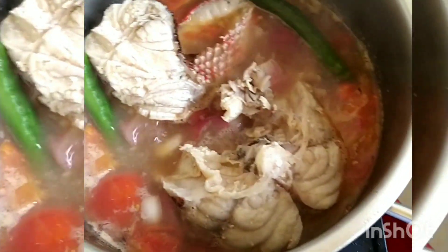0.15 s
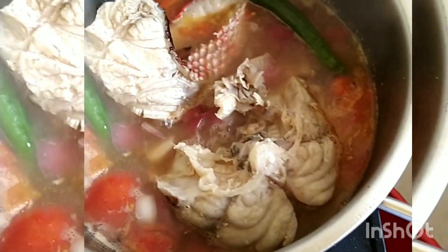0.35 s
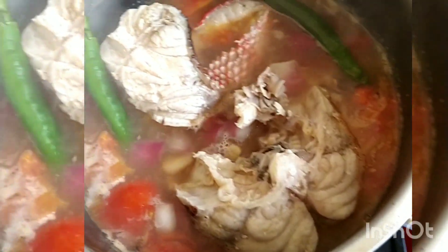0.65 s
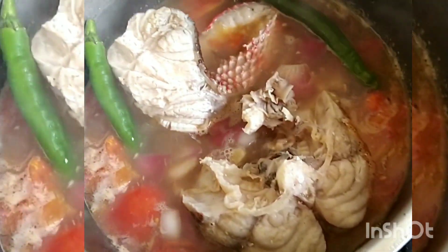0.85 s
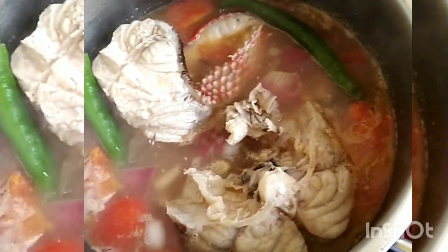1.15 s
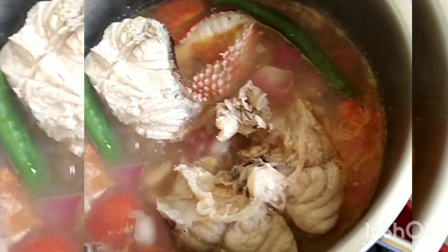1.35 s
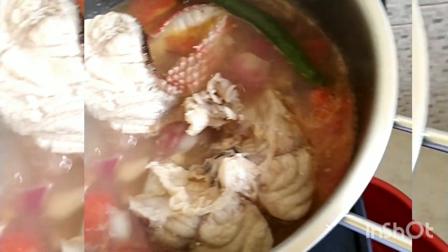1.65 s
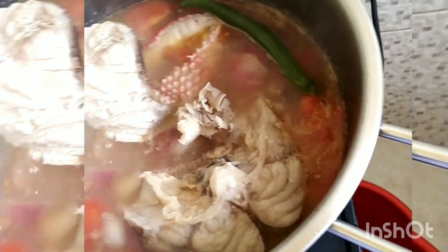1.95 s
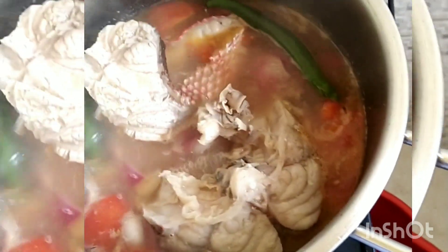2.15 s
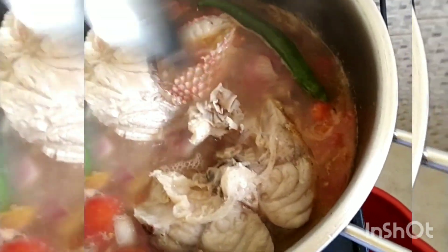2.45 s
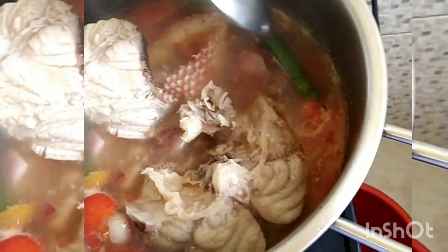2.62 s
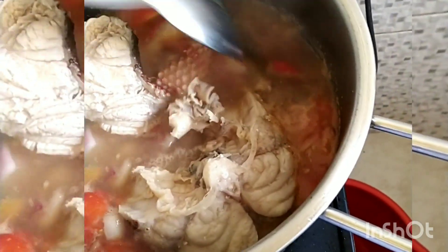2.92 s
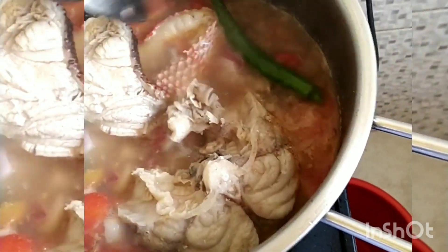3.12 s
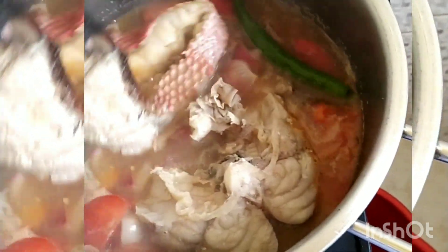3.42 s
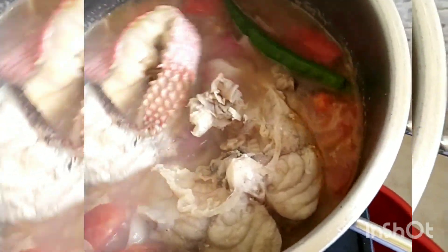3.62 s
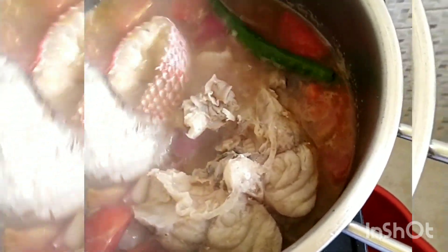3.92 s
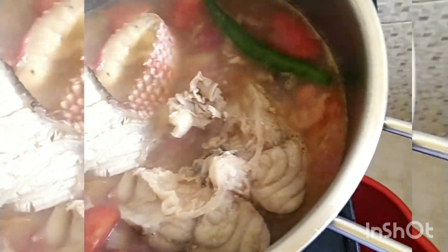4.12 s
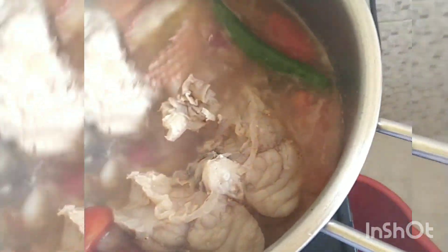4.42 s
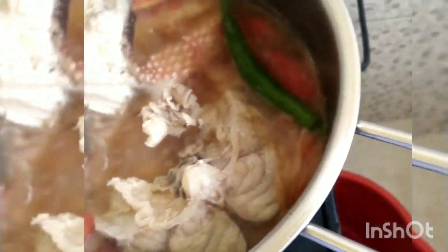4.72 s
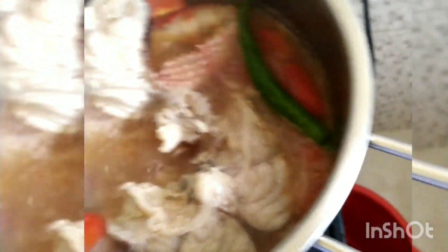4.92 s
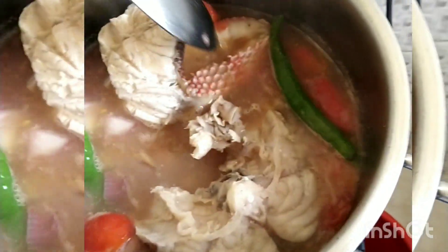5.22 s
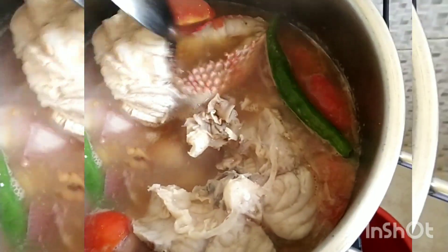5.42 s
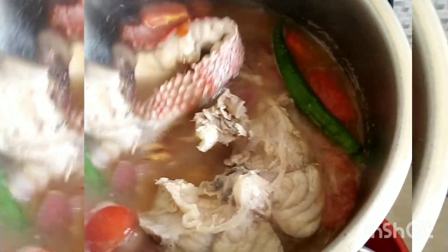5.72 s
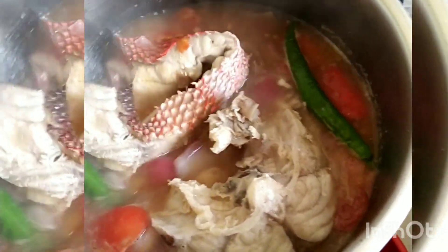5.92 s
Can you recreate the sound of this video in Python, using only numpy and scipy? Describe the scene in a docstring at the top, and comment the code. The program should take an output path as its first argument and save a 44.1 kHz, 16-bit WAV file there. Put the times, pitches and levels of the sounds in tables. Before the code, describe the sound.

Stew simmers softly in a steel pot close to the microphone, fizzing, spitting and plopping over a low burner rush and faint hum. Dull knocks come first, then a spoon clanks, a fork clinks and a quick rattle rings the pot with a low thump. After a stretch of quiet bubbling, a utensil is knocked down with one sharp crack in the hard-walled kitchen.

```python
"""Stew simmering in a kitchen

A steel pot of stew starts to simmer close by, over the rush of the stove and a faint hum.
Metal utensils clatter, clink on the pot and are knocked down: each blow cracks, rings briefly
and hangs between the hard walls. In between, the broth fizzes, spits and plops as bubbles break."""
import sys
import numpy as np
from scipy import signal
from scipy.fft import rfft, irfft, next_fast_len
from scipy.io import wavfile
from scipy.ndimage import map_coordinates

SR = 44100
rng = np.random.default_rng(int(sys.argv[2]) if len(sys.argv) > 2 else 0)


def pcm_store(signal):
    """Save signal as 16-bit PCM."""
    levels = np.round(np.clip(np.atleast_2d(signal), -1, 1) * 32767)
    wavfile.write(sys.argv[1], SR, levels.astype(np.int16).T)


N = 267687
GRID_HZ = np.fft.rfftfreq(16384, 1 / SR)
# bright colour of a tiny tick: f/Hz, level/dB
TICK_COLOUR = [(1200, -21.5), (2100, -3), (3000, -5.5), (4300, -10.5), (6000, -9.5), (8000, -2),
               (10000, 5.5), (11500, -5), (14000, -10.5), (15500, -33.5)]


def amp(db):
    return 10 ** (np.asarray(db) / 20)


def unit(x):
    return x / np.sqrt(np.mean(x ** 2) + 1e-20)


def blow(x):
    """Give x the energy of 5 ms at rms 1."""
    return unit(x) * np.sqrt(SR / 200 / x.shape[-1])


def along(points, hz):
    """Read (f/Hz, value) points on a log axis."""
    f, v = np.transpose(points)
    return np.interp(np.log(hz + 1), np.log(f + 1), v)


def add(track, s, x):
    """Mix x into the track from time s on."""
    part = track[:, round(s * SR):][:, :x.shape[-1]]
    part += x[..., :part.shape[-1]]


def wobble(rate):
    """A smooth random curve, rate knots a second."""
    knots = rng.standard_normal(int(N * rate / SR) + 4)
    return map_coordinates(knots, [np.arange(N) * rate / SR])


def colour(points):
    """An EQ curve of rms 1 from (f/Hz, level/dB) points."""
    return unit(amp(along(points, GRID_HZ)))


def resonances(modes, spread):
    """An EQ curve of steep peaks, their widths scaled by spread."""
    hz, width, db = np.transpose(modes)[:, :, None]
    peaks = amp(db) / (1 + (2 * (GRID_HZ - hz) / (spread * width)) ** 2)
    return unit(np.linalg.norm(peaks, axis=0))


def response(gain):
    """The minimum-phase impulse response of an EQ curve."""
    cepstrum = irfft(np.log(gain + 1e-6))
    half = len(cepstrum) // 2
    cepstrum[1:half] *= 2
    cepstrum[half + 1:] = 0
    return irfft(np.exp(rfft(cepstrum)))[None, :half]


def coloured(x, gain):
    """Play x through an EQ curve, letting its peaks ring."""
    return signal.fftconvolve(x, response(gain), axes=1)[:, :x.shape[-1]]


def filtered(x, gain_at):
    """Zero-phase EQ by a function of frequency."""
    n = x.shape[-1]
    m = next_fast_len(n + 8192)
    return irfft(rfft(x, m) * gain_at(np.fft.rfftfreq(m, 1 / SR)), m)[..., :n]


def diffuse(n, apart_hz=880, alike=0.97):
    """Stereo room noise: alike in the bass, unrelated in the treble."""
    mid, side = rng.standard_normal((2, n))
    turn = lambda hz: np.arccos(np.clip(alike * np.sinc(hz / apart_hz), -1, 1)) / 2
    mid = filtered(mid, lambda hz: np.cos(turn(hz)))
    side = filtered(side, lambda hz: np.sin(turn(hz)))
    return np.array([mid + side, mid - side])


def crack(gain, t60):
    """A contact's transient: a short burst of coloured noise."""
    t = np.arange(SR // 5) / SR
    return blow(coloured(diffuse(len(t)) * amp(-60 * t / t60), gain))


def kitchen(direct, radiated, room_db, build_s=0.0024):
    """Direct sound plus a diffuse tail in which each frequency dies at its own speed."""
    # reverb time: f/Hz, t60/s
    decay = [(100, 0.49), (260, 0.54), (700, 0.54), (1840, 0.52), (4850, 0.56), (9000, 0.43), (13000, 0.36)]
    hz, t, bands = signal.stft(diffuse(SR * 2 // 3), SR, nperseg=256)
    tail = signal.istft(bands * amp(-60 * t / along(decay, hz)[:, None]), SR, nperseg=256)[1]
    tail *= 1 - np.exp(-np.arange(tail.shape[1]) / SR / build_s)
    wet = signal.fftconvolve(radiated[:1], tail, axes=1)
    wet *= amp(room_db) * np.linalg.norm(direct) / np.linalg.norm(wet)
    add(wet, 0, direct)
    return wet


def background(rush_db=-51, hiss_db=-63, hum_trim_db=-2, waver_rad=0.8):
    """The burner's rush, a thin high hiss of distant simmering and a slightly unsteady hum."""
    # two noise colours and the hum's partials: f/Hz, relative level/dB
    rush_colour = [(20, -43.5), (38, -33.5), (50, -23.5), (66, -0.5), (95, -7.5), (130, -4), (235, -7),
                   (320, -4.5), (500, -8), (890, -12), (1500, -19), (2100, -35), (2700, -72), (6000, -54),
                   (9000, -65)]
    hiss_colour = [(6000, -37.5), (8300, -21), (9300, 4.5), (10200, 0.5), (11200, -33.5), (14000, -24.5),
                   (15500, -32.5)]
    partials = [(123.8, -61), (172.3, -59.5), (344.5, -61.5), (403.7, -67.5)]
    t = np.arange(N) / SR
    rush = amp(rush_db) * unit(coloured(diffuse(N), colour(rush_colour)))
    hiss = amp(hiss_db + 1.1 * wobble(32)) * unit(coloured(diffuse(N), colour(hiss_colour)))
    hum = np.zeros(N)
    for hz, db in partials:
        level = amp(db + hum_trim_db + 2.2 * wobble(7))
        hum += level * np.sqrt(2) * np.sin(2 * np.pi * hz * t + waver_rad * wobble(11))
    return rush + hiss + hum


def bubble(hz, t60, rise=3):
    """A bursting bubble rings briefly while its pitch climbs."""
    t = np.arange(SR // 10) / SR
    chirp = np.sin(2 * np.pi * hz * (t + rise * t * t)) * amp(-60 * t / t60)
    return blow(np.tile(chirp, (2, 1)))


def bubbling(count=130, pitch_hz=620, level_db=-58):
    """Small bubbles of scattered size break all over the broth."""
    out = np.zeros((2, N))
    times = rng.uniform(0, N / SR, count)
    for s, (detune, strength) in zip(times, rng.standard_normal((count, 2))):
        hz = pitch_hz * np.exp(0.32 * detune)
        add(out, s, amp(level_db + 2 * strength) * bubble(hz, t60=10 / hz))
    return kitchen(out, out, room_db=8)[:, :N]


def in_pot(ring_db):
    """The colour of a tick with the pot's ring added."""
    # the open pot above the broth: f/Hz, width/Hz, level/dB
    modes = [(2052, 100, 2.5), (2528, 42, 1.5), (2920, 19, 3), (3450, 99, -8.5), (4080, 75, -16),
             (4620, 100, -8), (5140, 38, -5.5), (7170, 40, 0), (7670, 54, -8), (8220, 230, -5.5),
             (9100, 340, -0.5), (10440, 110, -1.5), (11280, 61, -8), (12320, 43, -12), (12400, 130, -13.5),
             (12980, 49, -14), (13400, 84, -9.5)]
    return np.hypot(colour(TICK_COLOUR), amp(ring_db) * resonances(modes, spread=3.2))


def droplet(mid_db, ring_db, body_db=8, body_hz=4800):
    """The colour of a tick in the pot; wetter ones have more body."""
    return in_pot(ring_db) * amp((mid_db + body_db) / (1 + (GRID_HZ / body_hz) ** 2))


def ticks(gain, per_second=260, scatter_db=5, t60=0.012):
    """Countless spurts of very uneven size, at rms 1."""
    onsets = rng.random(N) < per_second / SR
    sizes = onsets * amp(scatter_db * np.clip(rng.standard_normal(N), -2, 2))
    power = signal.lfilter([1], [1, -amp(-60 / (t60 * SR)) ** 2], sizes ** 2)
    return unit(coloured(np.sqrt(power) * rng.standard_normal((2, N)), gain))


def sizzle(rise_s=0.03, fall_s=0.064, rest_db=-75, pan_db=1.8):
    """The broth fizzes in spells that swell, hold and die away, over a faint resting crackle."""
    # t/s, length/s, level/dB, relative mids/dB
    spells = [(0.03, 0.47, -49.5, -9.5), (0.564, 0.12, -49.5, -6.5), (0.98, 0.46, -52.5, -9),
              (2.768, 0.08, -62.5, -6.5), (3.51, 0.17, -52.5, -1.5), (4.28, 0.34, -55.5, -5),
              (5.45, 0.36, -61, 7)]
    t = np.arange(N) / SR
    fizz = amp(rest_db) * ticks(in_pot(ring_db=2))
    for s, length, db, mid_db in spells:
        attack = np.clip((t - s) / rise_s, 0, 1)
        release = np.exp(-np.maximum(t - s - length, 0) / fall_s)
        fizz += amp(db) * attack * release * ticks(droplet(mid_db, ring_db=-2.5))
    heard = unit(kitchen(fizz, fizz, room_db=0.5)[:, :N]) * np.sqrt(np.mean(fizz ** 2))
    return heard * amp([[pan_db / 2], [-pan_db / 2]])


def spits(trim_db=-9):
    """Broth spits at the hot wall, each tick with a colour of its own."""
    # t/s, relative level/dB, relative mids/dB
    bursts = [(0.029, -29.5, -7.5), (0.3316, -29.5, -9), (0.9986, -28.5, -0.5), (1.3024, -32, -13),
              (1.5, -32, -4), (3.262, -28.5, -10), (3.6242, -37.5, 3), (3.724, -36.5, 1),
              (3.976, -27.5, -6.5), (4.2026, -32, -9), (4.412, -35, 12), (5.2637, -29.5, -14.5),
              (5.44, -35, -7.5), (5.5497, -35, -5), (5.742, -38.5, 6), (5.7937, -31, -6)]
    out = np.zeros((2, N))
    for s, db, mid_db in bursts:
        gain = droplet(mid_db, ring_db=-5)
        direct, send = crack(gain, t60=0.05), crack(gain, t60=0.017)
        add(out, s, amp(db + trim_db) * kitchen(direct, send, room_db=6))
    return out * amp([[0.7], [-0.7]])


def struck(hits, modes, crack_colour, spread, pan_db, top_pan_db):
    """Each contact cracks and rings the object's modes; the treble has its own pan (+ is left)."""
    # hits: t/s, level/dB, ring over crack/dB, crack t60/s, room over direct/dB
    # modes: f/Hz, width before spread/Hz, level/dB
    # crack_colour: f/Hz, level/dB
    out, ring = np.zeros((2, N)), resonances(modes, spread)
    for s, db, ring_db, t60, room_db in hits:
        body = np.hypot(colour(crack_colour), amp(ring_db) * ring)
        add(out, s, amp(db) * kitchen(crack(body, t60), response(body), room_db))
    pan = [(2000, pan_db), (10000, top_pan_db)]
    return filtered(out, lambda hz: amp(along(pan, hz) * np.array([[.5], [-.5]])))


def board():
    """Three dull knocks ring the board's low modes."""
    # columns here and for the utensils and pot: see struck()
    hits = [(0.113, -37, -13, 0.049, 1), (0.1295, -34.5, -1, 0.036, 8), (0.201, -23, 3.5, 0.16, 1.9)]
    modes = [(336, 8.5, -5.5), (558.3, 13, -3), (790, 22, -5.5), (1058, 74, -9), (1640, 66, -16.5),
             (2240, 28, -21)]
    knock = [(120, -65.5), (200, -19), (446, -8), (521, -10), (1130, -10.5), (1400, -9.5), (1660, -15),
             (3030, -23), (8000, -35.5), (10400, -47.5), (17600, -120)]
    return struck(hits, modes, knock, spread=1.5, pan_db=2.5, top_pan_db=-3)


def plops(t60_at_1khz=0.027, lengthen=1.1, splash_t60=0.019, splash_octaves=0.72):
    """Large bubbles tear with a small splash and ring; high plinks last longer than low plops."""
    # t/s, f/Hz, level/dB, splash over ring/dB
    bubbles = [(0.385, 2550, -47.5, -0.5), (1.122, 734, -44.5, -1), (1.469, 700, -50.5, -5),
               (2.479, 710, -50.5, -6.5), (2.815, 1100, -51, -5), (3.041, 2370, -63, -22),
               (3.36, 710, -48.5, 3), (3.398, 1243, -44.5, -10), (3.487, 950, -47.5, 6),
               (5.743, 2880, -54.5, -7)]
    out = np.zeros((2, N))
    for s, hz, db, splash_db in bubbles:
        band = np.exp(-(np.log2((GRID_HZ + 1) / hz) / splash_octaves) ** 2 / 2)
        pop = amp(splash_db) * crack(band, splash_t60)
        add(pop, 0, bubble(hz, t60_at_1khz * (hz / 1000) ** lengthen))
        add(out, s, amp(db) * kitchen(pop, pop, room_db=3.5))
    return out


def spoon():
    """A spoon clatters: four contacts run into one bright clank."""
    hits = [(0.687, -15.5, 0, 0.037, 5.5), (0.6925, -11.5, 10, 0.065, 0), (0.695, -12.5, 3.5, 0.032, 1.5),
            (0.7065, -19.5, 1, 0.017, 9)]
    modes = [(324, 48, -14), (508, 52, -10.5), (815, 84, -2), (920, 68, -16), (1241, 94, -7.5),
             (1420, 68, -21), (1923, 200, 0), (2116, 51, -0.5), (2110, 59, -3.5), (2390, 40, -1.5),
             (2763, 66, -8), (3175, 44, -10), (3480, 51, -7.5), (3830, 55, 1), (4040, 72, -12),
             (4150, 160, -10), (4630, 25, -4), (5150, 130, -29.5), (5460, 130, -13.5), (6680, 86, -8.5),
             (7100, 90, -2), (7700, 150, -8.5), (7900, 93, -12), (8280, 37, 5), (9270, 98, -3.5),
             (9640, 140, -4.5), (10030, 72, 2), (10440, 150, -0.5), (10916, 90, -5.5), (11610, 230, -9.5)]
    clack = [(150, -23), (330, -18), (400, -8), (800, -7), (1100, -8.5), (2050, -7.5), (2800, -23),
             (4100, -12), (6000, -11.5), (8000, -7), (10200, -2), (13500, -11.5), (15300, -59.5)]
    return struck(hits, modes, clack, spread=0.9, pan_db=2.5, top_pan_db=0.1)


def tip():
    """A utensil's tip touches lightly and rings high and thin."""
    hits = [(1.5643, -29.5, 2.5, 0.074, 3), (3.853, -44.5, 11, 0.011, 1.9)]
    modes = [(7784, 87, -2), (10530, 150, 2), (11850, 90, -0.5), (11900, 70, -1.5)]
    return struck(hits, modes, TICK_COLOUR, spread=1.8, pan_db=2, top_pan_db=-4.2)


def fork():
    """A fork strikes once with a sharp clink."""
    hits = [(1.649, -12.5, 0.5, 0.026, -0.5)]
    modes = [(474, 39, 2.5), (1189, 120, 0.5), (1812, 110, -3.5), (2320, 28, -16.5), (2560, 380, -4.5),
             (3710, 250, -1), (4250, 190, -12), (4710, 44, -19.5), (4960, 210, -9.5), (5520, 83, -4.5),
             (6230, 160, -8.5), (6150, 56, -5), (7300, 46, -26), (7360, 82, -19.5), (7400, 230, -10.5),
             (7930, 50, -9), (8540, 78, 0.5), (9210, 43, -3), (9470, 110, 2.5), (10550, 110, -1),
             (10600, 15, -3), (11000, 65, -9), (11400, 55, -9), (12400, 36, -13.5), (12540, 27.7, -25.5),
             (12870, 36, -17.5), (13130, 85, -6), (13900, 28, -19.5)]
    click = [(100, -17.5), (320, -9), (520, 5), (950, -8), (1200, -10.5), (1450, -10), (1850, -3),
             (3600, 0), (4500, -22), (5300, -6.5), (7500, 3), (10300, 4), (13700, -10), (15300, -32)]
    return struck(hits, modes, click, spread=1.07, pan_db=2.5, top_pan_db=-1.5)


def thumps():
    """The loaded pot rocks on its stand, whose low boom swells in the room."""
    # t/s, level/dB
    jolts = [(1.651, -36.5), (2.012, -35), (2.041, -28)]
    # f/Hz, level/dB
    stand_colour = [(40, -30), (80, -17.5), (130, 1), (175, -3.5), (230, -10.5), (330, -1.5), (600, -29)]
    out, boom = np.zeros((2, N)), colour(stand_colour)
    for s, db in jolts:
        thud = crack(boom, t60=0.11)
        add(out, s, amp(db) * kitchen(thud, response(boom), room_db=6.5, build_s=0.016))
    return out


def pot():
    """A quick rattle of blows rings the steel pot."""
    hits = [(1.9378, -21.5, 3.2, 0.0027, 5), (2.011, -8, 12.5, 0.036, -1), (2.0145, -19, 9.7, 0.0033, 2.5),
            (2.035, -13.5, 3.9, 0.034, -0.5), (2.038, -13.5, 17, 0.0023, -1.5)]
    modes = [(319.7, 47, -4.5), (489, 31, -2), (591, 11, -4.5), (1182, 110, 1), (1735, 170, -5),
             (2090, 140, -7.5), (2534, 100, 0), (2830, 330, -9), (3570, 130, -1.5), (3860, 174, -2.5),
             (4210, 70, -12), (5076, 370, -9), (5550, 200, -8.5), (6360, 280, -6.5), (7036, 120, 0.5),
             (7610, 230, -2), (8260, 430, -4.5), (9020, 216, 1), (9950, 200, -4.5), (9700, 150, 1.5),
             (10450, 170, 0.5), (11000, 130, -3), (11750, 250, -10.5), (12150, 130, -9.5),
             (12850, 300, -21.5), (13450, 360, -10.5)]
    clack = [(100, -21.5), (320, -1.5), (600, 6), (900, 2.5), (1200, -3), (1450, 1), (1900, 10),
             (3600, -12.5), (4500, -18), (5300, -4.5), (7500, -0.5), (10300, -2), (13700, -12),
             (15300, -33.5)]
    return struck(hits, modes, clack, spread=1.2, pan_db=2, top_pan_db=-1.3)


def ladle():
    """A ladle is knocked down, more crack than ring."""
    hits = [(4.5897, -35, -17, 0.0067, -0.91), (4.5912, -10.5, -6, 0.021, 0.074)]
    modes = [(179, 16, -20.5), (556, 49, -14), (837, 18, 3.5), (1188, 24, 7), (1650, 17, -33.5),
             (2034, 40, 2.5), (2168, 23, 3), (2540, 47, -2), (3330, 42, -12), (3495, 54, -5)]
    knock = [(60, -49), (160, -9.5), (240, -21.5), (330, 0.5), (400, -4.5), (530, 4), (730, -6.5),
             (1100, -3), (1800, -4), (3400, -7.5), (4900, -14.5), (10200, -8), (13500, -24), (15300, -47)]
    return struck(hits, modes, knock, spread=2.1, pan_db=2.2, top_pan_db=-0.8)


def scene():
    """Utensils around the pot and the stew in it, over the kitchen's background."""
    clatter = spoon() + fork() + pot() + tip() + ladle() + board()
    stew = spits() + plops() + bubbling() + sizzle()
    return clatter + thumps() + stew + background()


def record(dry):
    """Soft-clip the loudest peaks, then cut the deepest bass and the very top."""
    low_cut_hz, high_cut_hz = 45, 15000
    rounded = dry / (1 + np.abs(dry) ** 6) ** (1 / 6)
    thinned = signal.sosfilt(signal.butter(2, low_cut_hz, "highpass", fs=SR, output="sos"), rounded)
    return filtered(thinned, lambda hz: 1 / np.sqrt(1 + (hz / high_cut_hz) ** 120))


dry = scene()
out = record(dry)
pcm_store(out)
```